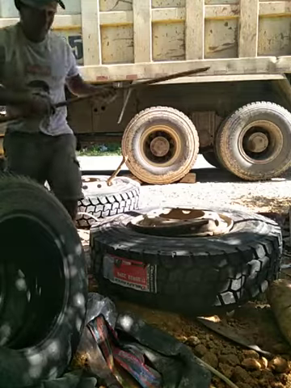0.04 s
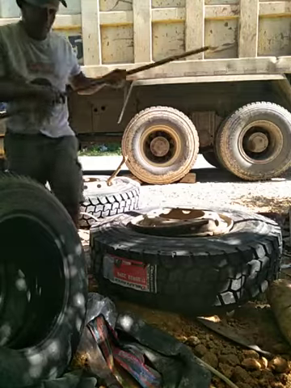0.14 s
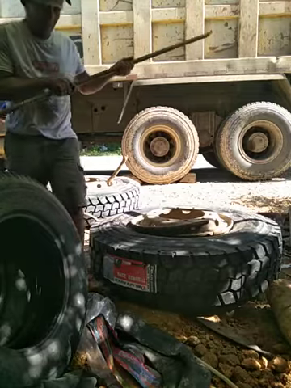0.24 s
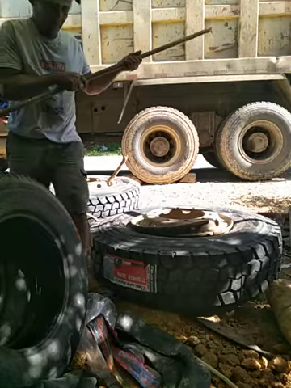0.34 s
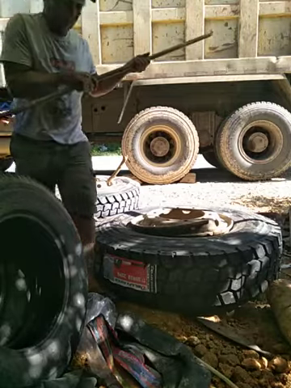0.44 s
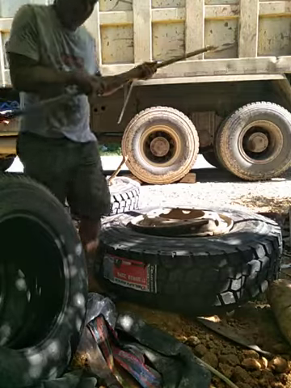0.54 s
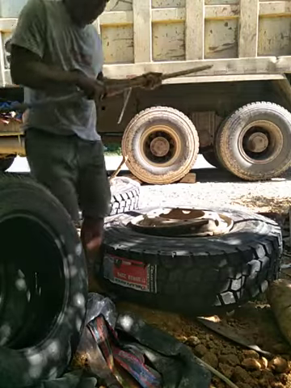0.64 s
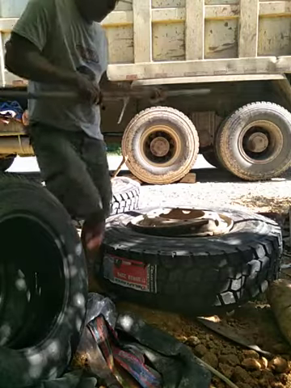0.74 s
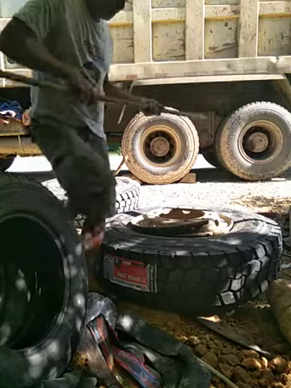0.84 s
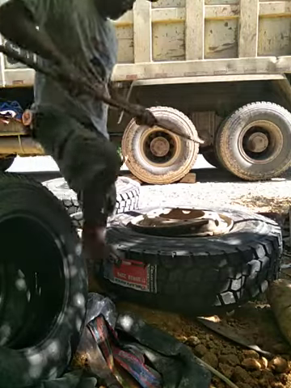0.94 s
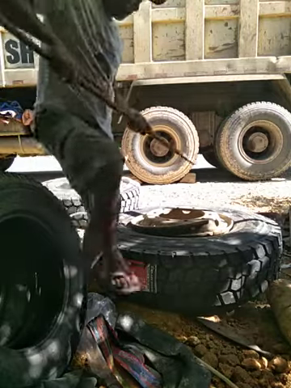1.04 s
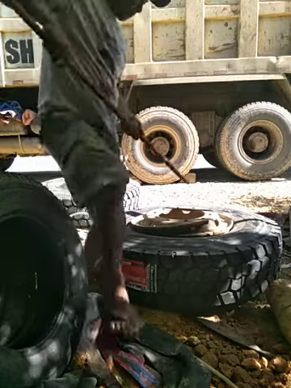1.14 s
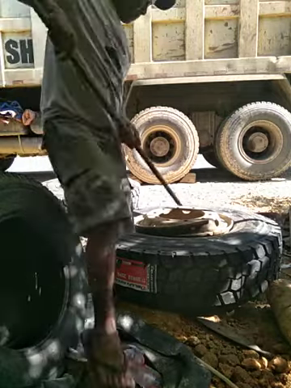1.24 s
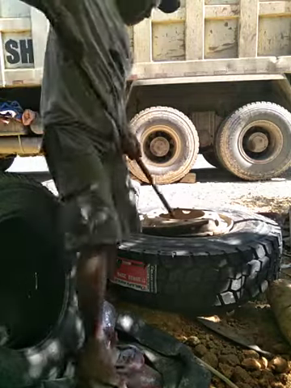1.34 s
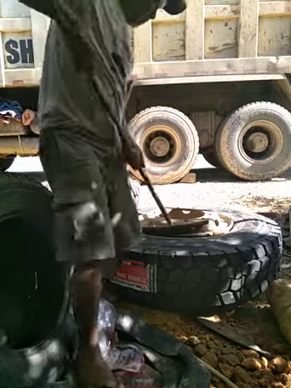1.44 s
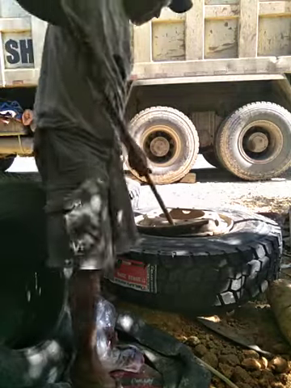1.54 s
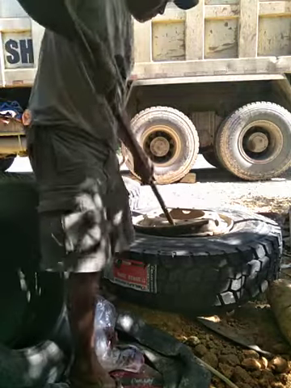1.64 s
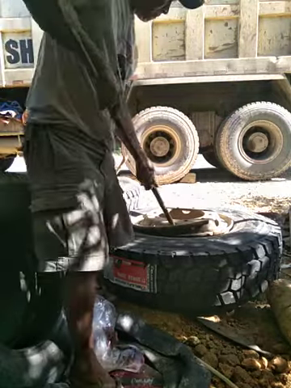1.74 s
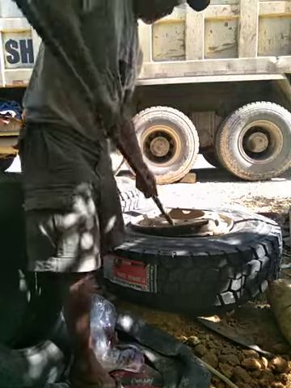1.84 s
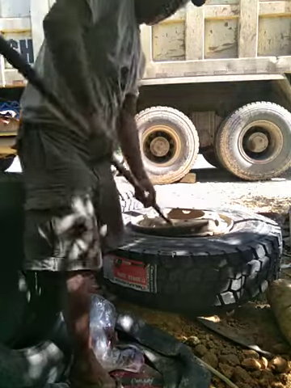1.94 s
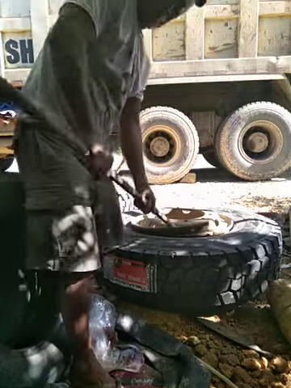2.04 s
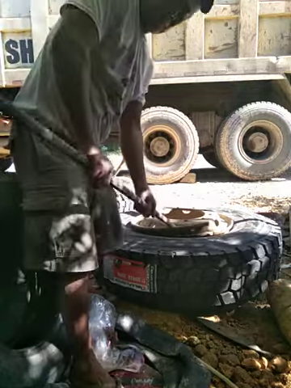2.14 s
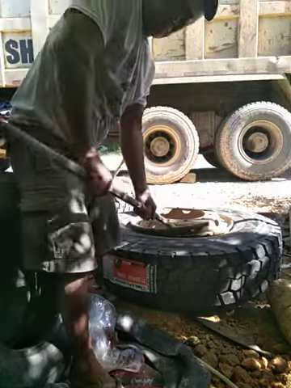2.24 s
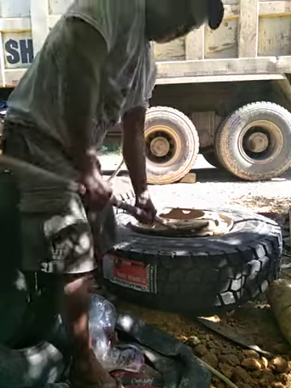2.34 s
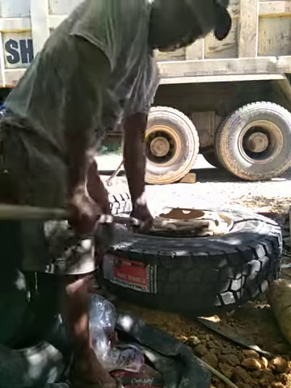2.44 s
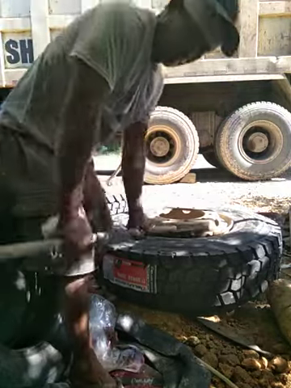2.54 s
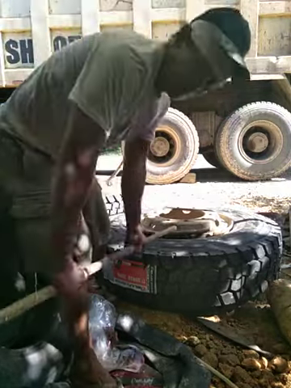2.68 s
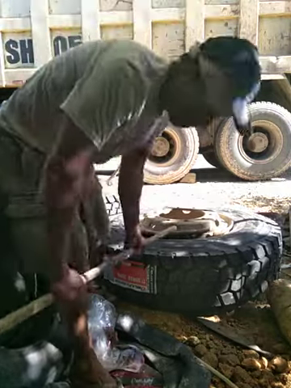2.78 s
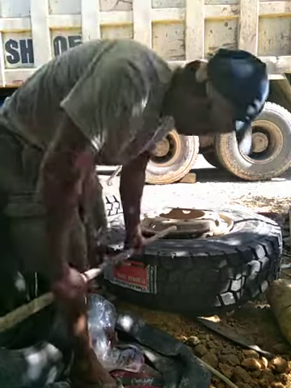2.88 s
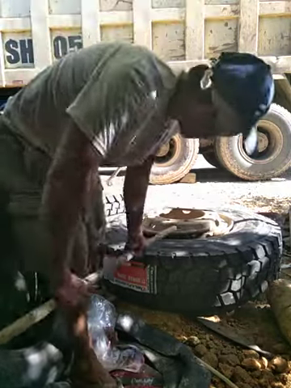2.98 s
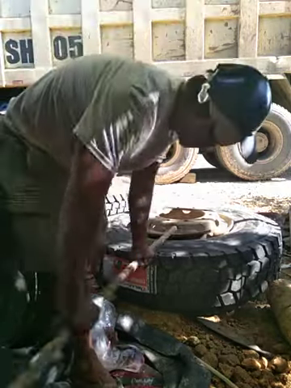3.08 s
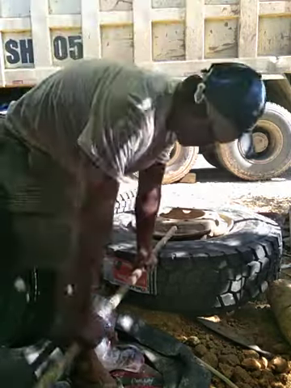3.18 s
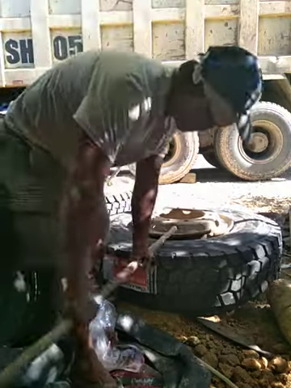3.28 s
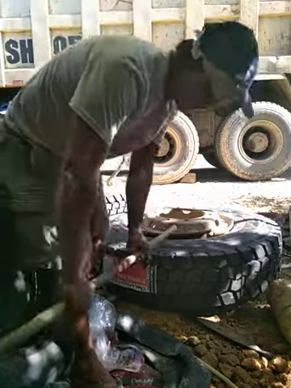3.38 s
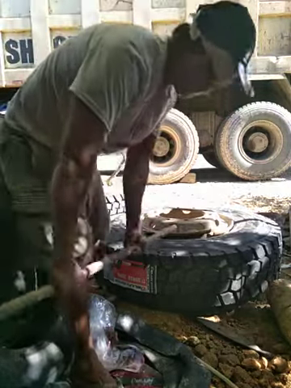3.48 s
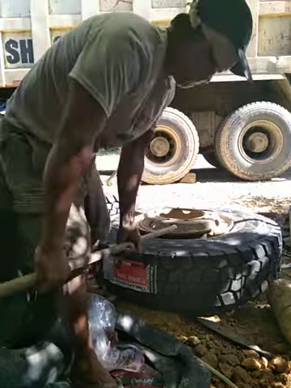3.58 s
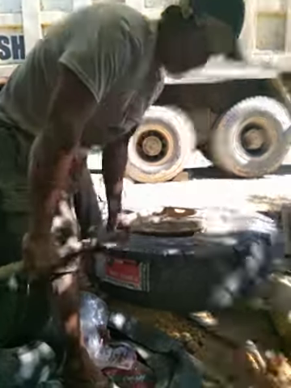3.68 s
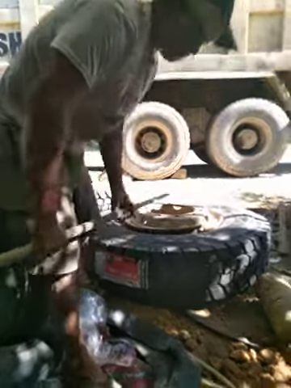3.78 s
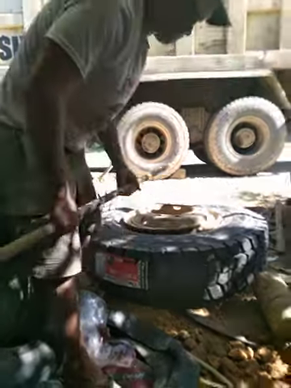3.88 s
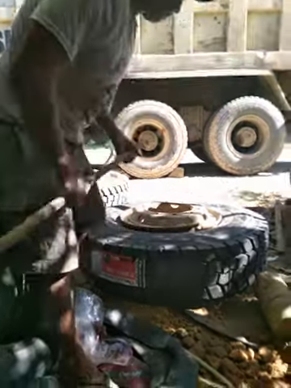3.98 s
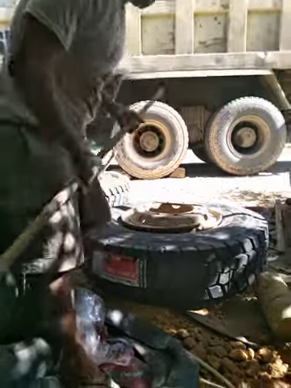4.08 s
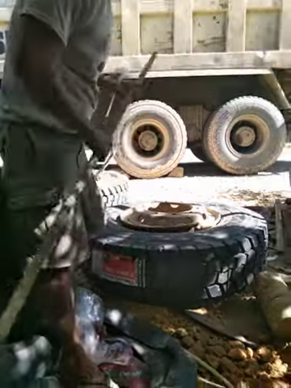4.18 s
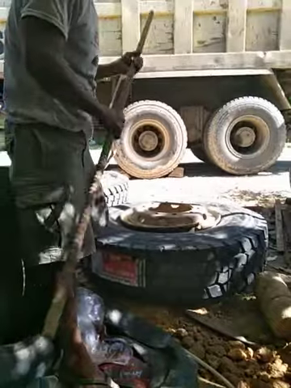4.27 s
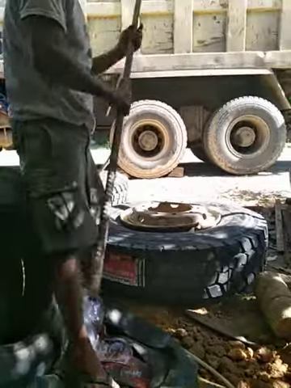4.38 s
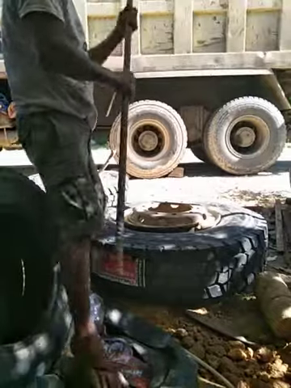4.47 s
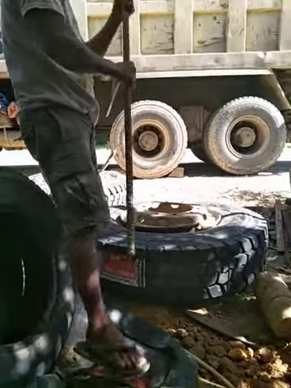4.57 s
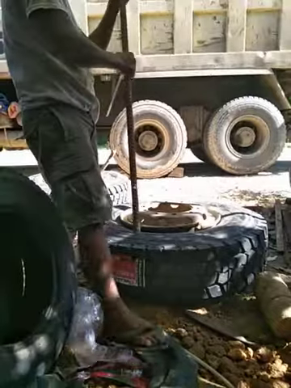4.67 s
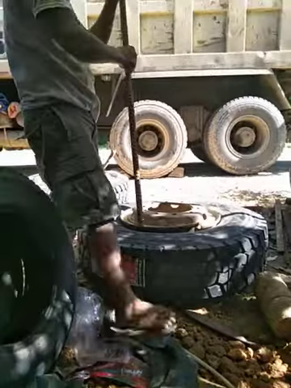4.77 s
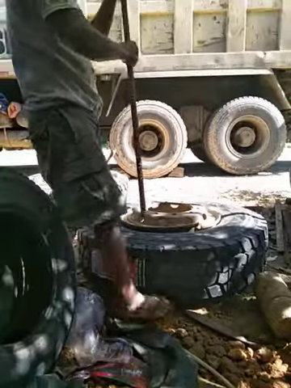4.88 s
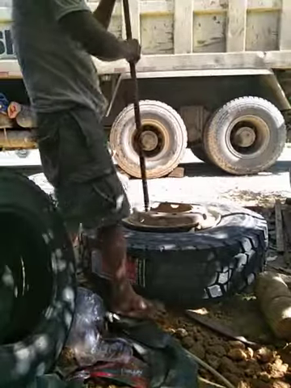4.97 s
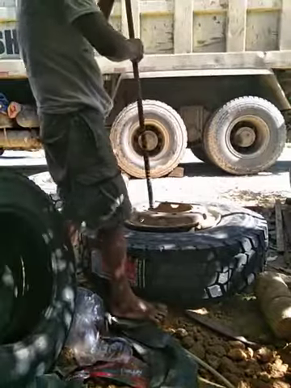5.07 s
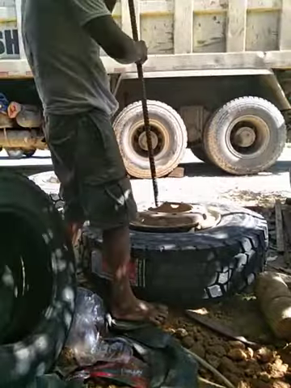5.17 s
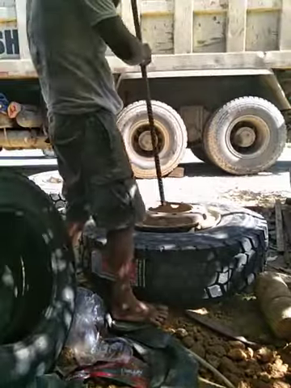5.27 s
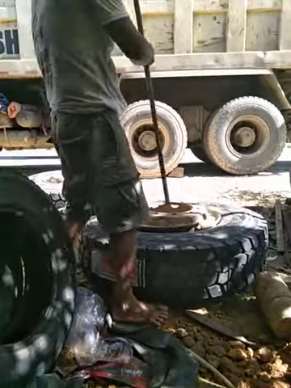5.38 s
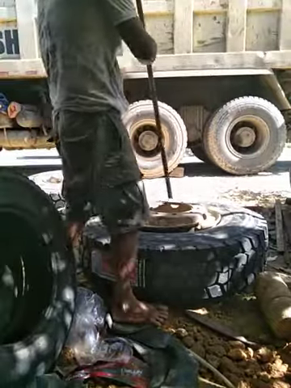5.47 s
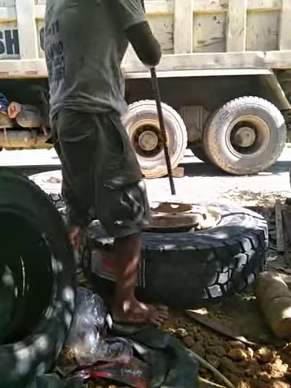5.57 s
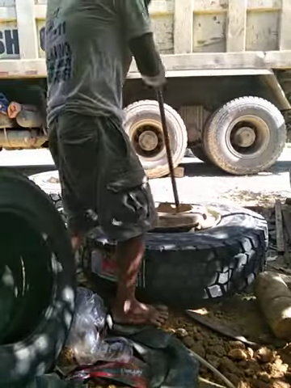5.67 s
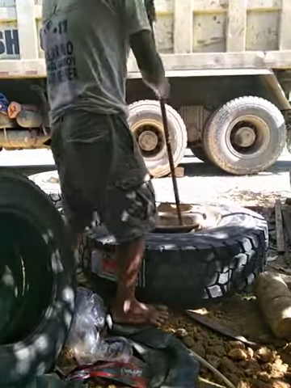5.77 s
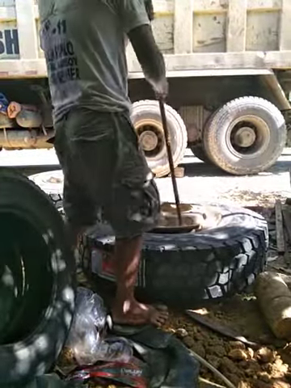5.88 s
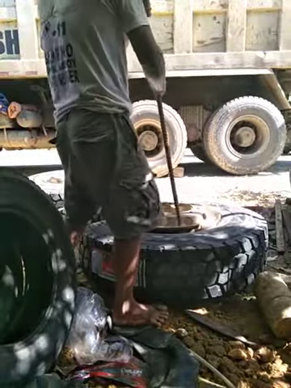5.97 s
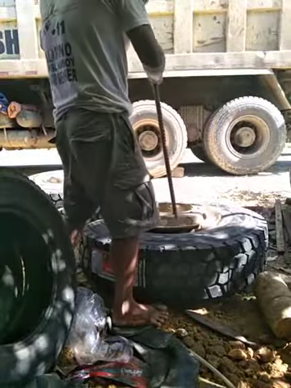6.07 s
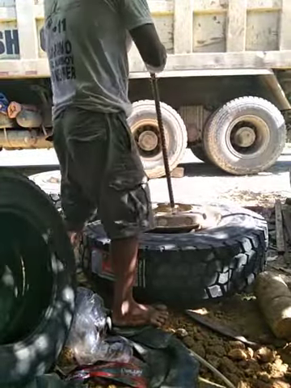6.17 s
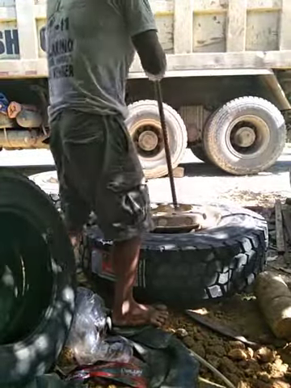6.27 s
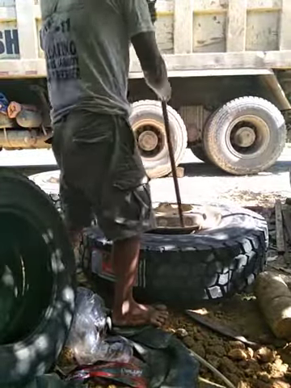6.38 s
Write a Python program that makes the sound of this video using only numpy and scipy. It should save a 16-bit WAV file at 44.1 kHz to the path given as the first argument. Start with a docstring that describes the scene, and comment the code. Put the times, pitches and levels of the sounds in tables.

```python
"""Outdoors, a one-cylinder machine chugs over a drone while feet shuffle and loose metal clatters and tinkles.
From 1.5 s a steel tyre bar knocks, chatters and clanks on a lorry wheel's rim: decaying steel modes, struck.
At 3.7 s the bar drags over gritty rubber and the tyre thuds: gated grains and damped low modes.
Hollow knocks, a faint squeak and chinks of steel follow: short bursts in resonances, and a rising sine.
At 5.8 s the last blow is so loud that the recorder's limiter pulls everything down and lets go slowly."""
import sys
import numpy as np
from scipy import signal
from scipy.fft import rfft, irfft
from scipy.io import wavfile
from scipy.ndimage import uniform_filter1d

SR = 44100
rng = np.random.default_rng(int(sys.argv[2]) if len(sys.argv) > 2 else 0)


def unload_wav(signal):
    """Save mono or channel-first audio to the path in sys.argv[1] as 16-bit WAV at rate SR, clipped to [-1, 1]."""
    wavfile.write(
        sys.argv[1],
        SR,
        np.round(np.clip(np.atleast_2d(signal).T, -1, 1) * 32767).astype(np.int16),
    )


N = 283210
NOW = np.arange(N) / SR
RING = np.arange(int(.6 * SR)) / SR  # time axis of one struck sound, s


# modes of the rim [pitch_hz, level_db, t60_s]
RIM_MODES = [(861, 1, .2), (1120, -7, .2), (1179, -5, .24), (1305, -6, .2), (1400, -5, .2), (1510, -2, .24),
             (1522, -22, 1.2), (1631, 3, .23), (1728, 1.5, .22), (1814, -6, .2), (2180, -9, .22),
             (2310, -9, .18), (2552, -4, .2), (2789, -11, .22), (3250, -9, .19), (3472, -3.5, .2),
             (3828, -2, .22), (3860, -2, .21), (4030, -7, .21), (4200, -11, .23), (4920, -16, .27),
             (5335, -13, .25), (6056, -15, .18), (6433, -12, .17), (6800, -15, .18), (7560, -11, .18),
             (7704, -7, .2), (7865, -7, .19), (8258, -14, .16), (9082, -13, .18), (10900, -26, .2)]
# modes of the bar [pitch_hz, level_db, t60_s]
BAR_MODES = [(978, -7.5, .19), (1177, 2, 0.17), (1304, -1, 0.14), (1481, 1, 0.14), (1570, -1.5, 0.3),
             (2155, -13, 0.28), (2260, -2.5, .35), (2455, -4.5, 0.23), (2660, -7, 0.4), (2930, 1.5, 0.19),
             (3075, -8.5, 0.54), (3536, -1.5, 0.18), (4010, -5.5, 0.31), (4274, -4, .2), (4520, -15, .35),
             (4970, -12.5, 0.27), (5570, -18, .3), (5960, -16, 0.29), (6417, -22.5, .3), (6730, -18, 0.29),
             (7250, -13.5, .11), (8300, -17, .11)]
# modes of the lock ring [pitch_hz, level_db, t60_s]
LOCK_RING_MODES = [(945, -6, .25), (1095, -6, .2), (1175, -2, .24), (1324, 0, .28), (1410, -5, .35),
                   (1814, -1, .26), (2040, 1, .18), (2369, -10, .4), (4264, -7, .22), (6562, -12, .23),
                   (7354, -14, .25), (7720, -8, .17), (7973, -8, .24), (8947, -13, .16), (9184, -14, .17),
                   (9680, -17, .24)]
# spectrum of the rim's crowd of weak, close modes [pitch_hz, density_db_per_hz]
CROWD_SPECTRUM = [(300, -61), (700, -46.5), (860, -7.5), (1200, 2), (1700, 5.5), (2300, -1), (2800, -3.5),
                  (3800, -3), (4250, -5.5), (4600, -6), (5400, -7.5), (7000, -12), (9000, -11),
                  (11500, -21.5), (15500, -44)]


def rim_crowd(length_s, hold, sag_db_per_s):
    """Many close modes of uneven strength sound as coloured noise that sags, then dies away."""
    crowd_t60_s = .26
    release_s = np.maximum(RING - hold * length_s, 0)
    fade = gain_of(-sag_db_per_s * RING - 60 * release_s / crowd_t60_s)
    rasp_db = 2.4 * wander(260)[:len(RING)] * np.exp(-RING / (2 * length_s))  # the contact rasps unevenly
    grid_hz = np.arange(500, 16000, 45)
    unevenness_db = rng.uniform(-1, 1, len(grid_hz)) * np.interp(grid_hz, [1000, 6000], [5, 11])
    noise = coloured(rng.standard_normal(len(RING)), np.column_stack([grid_hz, unevenness_db]))
    return burst(coloured(noise, CROWD_SPECTRUM) * fade * gain_of(rasp_db))


def blow(rim_db, bar_db, lock_db, edge_hz, treble_db, length_s, node_hz, tilt_db_per_oct, crowd_db=4.0,
         hold=0.95, low_hz=870, node_db=-14, node_width_hz=170, sag_db_per_s=45):
    """Chatter rings rim, bar and lock ring; soft contact cuts treble, and modes with a node at the spot are muted."""
    attack_s = .002
    force = chatter(length_s, per_s=2500)
    crowd = rim_crowd(length_s, hold, sag_db_per_s)
    rim = burst(ring(force, RIM_MODES) + gain_of(crowd_db) * crowd)
    bar = paired(force, BAR_MODES)
    lock_ring = paired(force, LOCK_RING_MODES)
    steel = gain_of(rim_db) * rim + gain_of(bar_db) * bar + gain_of(lock_db) * lock_ring

    grid_hz = np.arange(500, 16000, 45)
    off_node = (grid_hz % (2 * node_hz) - node_hz) / node_width_hz  # dips at odd multiples of node_hz
    spot_db = node_db * np.exp(-off_node ** 2) + tilt_db_per_oct * np.log2(grid_hz / 2000)
    steel = coloured_padded(steel, np.column_stack([grid_hz, spot_db]))
    steel = steel * (1 - np.exp(-RING / attack_s))
    high_pass = signal.butter(7, low_hz, "high", fs=SR, output="sos")
    steel = signal.sosfilt(high_pass, steel)  # small steel radiates no bass
    contact = [(edge_hz, 0), (edge_hz * 1.045, treble_db), (edge_hz * 2, treble_db * 1.23), (SR, treble_db * 1.8)]
    return coloured_padded(steel, contact)


# blows of bar on rim, part levels before the spot and contact filters; treble is that above the edge
# [start_s, rim_db, bar_db, lock_ring_db, contact_edge_hz, treble_db, chatter_s, first_muted_pitch_hz,
#  tilt_db_per_octave]
BLOW_EVENTS = [(1.546, -33.5, -21.5, -40, 7350, -16, 0.042, 1870, 1),
               (1.666, -42, -35.5, -60, 4000, -30, 0.008, 1870, 6),
               (1.732, -32, -24, -29.5, 1600, -18.5, 0.02, 1890, -0.5),
               (1.798, -52, -32.5, -41, 1590, -20, 0.031, 1880, -1),
               (1.843, -24, -24, -29, 1440, -29, 0.0097, 1890, 4.5),
               (1.857, -42, -35, -40, 1480, -28, .006, 1890, 4),
               (1.867, -33, -34, -41, 1527, -19.5, 0.0092, 1870, 3.5),
               (2.426, -32, -33, -32, 2420, -13.5, 0.021, 2930, -3.5),
               (2.512, -23, -40.5, -33, 3360, -21, 0.02, 4000, 3),
               (2.608, -34.5, -33, -37, 2680, -24, 0.03, 2120, 0),
               (2.6646, -18, -29.5, -25, 4900, -5.5, 0.0072, 1630, -0.5),
               (2.677, -25.5, -23, -26, 9400, 1, 0.013, 1750, 1),
               (2.687, -26.5, -34, -23.5, 8300, -8, 0.033, 1710, 1),
               (2.7892, -25, -37.5, -33, 7040, -8, 0.016, 2400, 1.5),
               (3.424, -46, -46, -61, 3940, -18, 0.013, 1820, -1),
               (4.758, -58, -43.5, -53, 1700, -26, 0.042, 2700, 2),
               (5.821, 12, -16, -19, 9500, -5, 0.078, 4600, 1)]


def blows():
    """Each blow of the bar sets the wheel's steel ringing."""
    out = np.zeros(N)
    for start_s, *how in BLOW_EVENTS:
        add(out, start_s, blow(*how))
    return out


# chinks of steel that stand out of the jingle [start_s, level_db, pitch_hz, t60_s]
CHINK_EVENTS = [(.218, -53, 7680, 0.12), (0.365, -56, 4060, 0.11), (0.65, -47.5, 2348, 0.19),
                (0.812, -45.5, 11340, 0.23), (.815, -54.5, 8930, 0.069), (.814, -60, 14800, 0.076),
                (2.01, -53, 4280, 0.1), (2.075, -50, 6570, 0.15), (2.425, -51, 5710, 0.051),
                (2.515, -51, 6040, 0.18), (2.86, -42, 2415, 0.18), (3.64, -50, 9300, .12),
                (3.645, -54, 5220, .14), (4.815, -45.5, 1180, 0.08), (5.235, -45, 2207, 0.32),
                (5.366, -53, 6450, 0.16), (5.37, -49, 2450, 0.22), (5.436, -52, 6150, 0.25),
                (5.44, -51, 4400, 0.17), (5.703, -58, 7400, .25), (5.726, -43, 2420, 0.94),
                (5.78, -44.5, 3860, 0.17)]


def chinks(scrape_db=-12):
    """Light chinks scrape and swell as the steel slides: a swelling chatter drives three modes."""
    out = np.zeros(N)
    for start_s, level_db, pitch_hz, t60_s in CHINK_EVENTS:
        cluster = [(pitch_hz * 0.58, -14, t60_s), (pitch_hz, 0, t60_s), (pitch_hz * 1.05, -10, t60_s)]
        slide = resonate_twice(chatter(0.015) * RING, pitch_hz, pitch_hz / 7)
        chink = ring(slide, cluster) + gain_of(scrape_db) * burst(slide)
        add(out, start_s, gain_of(level_db) * chink)
    return out


# the tyre's damped modes before the stiffness factor [pitch_hz, level_db, t60_s]
TYRE_MODES = [(88, 1.5, 0.19), (127.3, 13, 0.19), (148.3, 12, 0.25), (187.3, 6, 0.28), (235, -1, 0.14),
              (396, -12, 0.069)]
# shoves on the rubber, level before the band filter [start_s, level_db, length_s, stiffness_pitch_factor]
THUD_EVENTS = [(0.0, -42, 0.16, 0.4), (2.038, -38, 0.14, 0.66), (2.42, -35.5, 0.05, 0.73),
               (2.515, -29, 0.052, 0.73), (2.626, -33, 0.0069, 0.85), (2.67, -37, 0.085, 0.54),
               (2.762, -33, 0.079, 0.79), (2.81, -34, 0.048, 0.96), (3.185, -30, 0.061, 0.88),
               (3.238, -33.5, 0.013, 0.79), (3.737, -21, 0.071, 1.1), (3.832, -25.5, 0.032, 0.89),
               (3.916, -28.5, 0.033, 0.92), (3.985, -38, .09, 0.94), (5.824, -19, 0.018, 0.81)]


def tyre_thuds(low_hz=60, top_hz=450, give_s=0.0079):
    """Rubber slips in jerks and booms: a soft-edged chatter drives damped low modes."""
    out = np.zeros(N)
    for start_s, level_db, length_s, stiffness in THUD_EVENTS:
        modes = [(hz * stiffness, mode_db, t60_s) for hz, mode_db, t60_s in TYRE_MODES]
        shove = chatter(length_s, per_s=2700) * (1 - np.exp(-RING / give_s))
        add(out, start_s, gain_of(level_db) * ring(shove, modes))
    return signal.sosfilt(signal.butter(3, [low_hz, top_hz], "band", fs=SR, output="sos"), out)


def slide_gain(start_s, level_db, hold_s):
    """The bar bites, slides while the push eases, then comes free."""
    attack_s, ease_db_per_s, release_db_per_s = 0.008, 33, 176
    t = np.maximum(NOW - start_s, 0)
    fall_db = ease_db_per_s * t + release_db_per_s * np.maximum(t - hold_s, 0)
    return np.minimum(t / attack_s, 1) * gain_of(level_db - fall_db)


# slides of the bar over gritty rubber [start_s, level_db, hold_s]
DRAG_EVENTS = [(3.73, -24.5, 0.089), (3.829, -31, 0.026), (3.907, -45, 0.061)]
# spectrum of the drag [pitch_hz, density_db_per_hz]
DRAG_SPECTRUM = [(60, -36), (130, -1), (240, -5), (450, 12.5), (560, 8), (720, -18), (950, 2.5), (1150, -4),
                 (1700, -3.5), (2100, -19), (2450, -4.5), (2900, -9), (3400, -28.5), (7000, -43),
                 (14000, -64)]


def bar_drag(grains_per_s=14000):
    """Grit crunches under the dragged bar: random grains, jerking as the rubber grips and lets go."""
    grains = rng.standard_normal(N) * (rng.random(N) < grains_per_s / SR)
    jerks = gain_of(2 * wander(160))
    gain = sum(slide_gain(*row) for row in DRAG_EVENTS)
    return gain * evened(coloured(grains * jerks, DRAG_SPECTRUM))


# dull, hollow knocks [start_s, level_db, pitch_hz, t60_s]
KNOCK_EVENTS = [(4.338, -41, 490, 0.11), (4.412, -39.5, 490, 0.13), (5.301, -45, 324, 0.017),
                (5.442, -42, 477, 0.12)]


def knocks(contact_s=0.0029):
    """Dull, hollow knocks, each ringing on one low note."""
    out = np.zeros(N)
    for start_s, level_db, pitch_hz, t60_s in KNOCK_EVENTS:
        push = resonate(chatter(contact_s, per_s=3000), pitch_hz, pitch_hz / 2)
        add(out, start_s, gain_of(level_db) * ring(push, [(pitch_hz, 0, t60_s)]))
    return out


def squeak(middle_s=4.795, half_s=.025, middle_hz=960, rise_hz_per_s=6000, level_db=-45):
    """A faint rising squeak as the bar's tip slips: a gliding sine of unsteady level."""
    pitch_hz = middle_hz + rise_hz_per_s * np.clip(NOW - middle_s, -2 * half_s, 2 * half_s)
    tone = np.sin(2 * np.pi * np.cumsum(pitch_hz) / SR)
    return gain_of(level_db + 2 * wander(120)) * bell(middle_s, half_s) * tone


# shuffles on ground and rubber [middle_s, level_db, half_length_s]
STEP_EVENTS = [(.03, -36, 0.07), (2.08, -50.5, 0.95), (4.04, -35, 0.18), (4.68, -43.5, 0.097),
               (5.2, -44, 0.23), (5.7, -40, 0.16)]
# spectrum of shuffling feet [pitch_hz, density_db_per_hz]
FEET_SPECTRUM = [(30, -19), (70, -1.5), (120, 7.5), (230, 3), (340, -25.5), (470, 6), (750, -36),
                 (3000, -45), (12000, -75)]


def feet():
    """Feet shuffle on ground and rubber: unsteady low noise that swells and fades."""
    shuffle = coloured(rng.standard_normal(N) * gain_of(4 * wander(25)), FEET_SPECTRUM)
    return swells(STEP_EVENTS) * evened(shuffle)


STROKE_S = 0.068506
# the exhaust's broad resonances [pitch_hz, level_db, time_spread_s, unsteadiness_db]
EXHAUST_MODES = [(614, 2, .005, 1), (495, -10, 0.009, 4), (420, -19, .005, 5), (285, -16, .0065, 4),
                 (150, -13.5, 0.0071, 4), (1400, -18, 0.0018, 4)]


def exhaust_puff(t, bend, vary):
    """One puff excites the exhaust's resonances as short wave packets; long ones peak later."""
    build_s = .005
    out = np.zeros(len(t))
    for (hz, mode_db, spread_s, vary_db), chance in zip(EXHAUST_MODES, vary):
        envelope = np.exp(-((t - max(spread_s - build_s, 0)) / spread_s) ** 2)
        out += gain_of(mode_db + vary_db * chance) * envelope * np.cos(2 * np.pi * hz * bend * t)
    return out


# each stroke's puffs and their echoes [delay_s, level_db, unsteadiness_db]
STROKE_PUFFS = [(-.0099, -15, 2), (0., 0.5, 1), (.0081, -14, 3), (.0153, -12.5, 2.5), (.035, -15, 1.5),
                (.0484, -20, 1)]
# level of the chug and strength of its echoes over time [time_s, level_db, echo_db]
CHUG_LEVELS = [(0, -43, -4.5), (0.449, -41, 2.5), (.78, -43.5, -8), (.86, -45, -15.5), (1.2, -42.5, 2.5),
               (1.9, -40.5, -2.5), (2.6, -43.5, 4), (2.72, -42, -10.5), (2.9, -40, 1), (3.4, -39, 2),
               (3.95, -36.5, -2), (4.4, -38.5, 4.5), (4.7, -42.5, 8), (5.15, -38.5, 4.5), (5.25, -52, 11),
               (5.37, -70, 0.5), (5.44, -43.5, 8), (5.8, -39.5, -3), (5.9, -43, 1.5)]
# steady drone; width is that of each of two cascaded resonances [pitch_hz, width_hz, level_db]
DRONE_BANDS = [(121.4, 12, -54.5), (151.8, 16, -63), (303.4, 18, -54), (616, 49, -59)]


def machine(pitch_scatter=0.018, echo_jitter_s=0.000804):
    """Every stroke puffs through the exhaust, no two quite alike; echoes follow, over a steady drone."""
    t = np.arange(-SR // 50, SR // 50 + 1) / SR
    when_s, level_db, echo_db = np.transpose(CHUG_LEVELS)
    chug = np.zeros(N)
    for stroke_s in np.arange(.0278, N / SR, STROKE_S):
        for delay_s, puff_db, unsteady_db in STROKE_PUFFS:
            size, late, bend, *vary = rng.standard_normal(3 + len(EXHAUST_MODES))
            puff = exhaust_puff(t, 1 + pitch_scatter * bend, vary)
            is_echo = delay_s > .004
            gain = gain_of(puff_db + unsteady_db * size + is_echo * np.interp(stroke_s, when_s, echo_db))
            add(chug, stroke_s + delay_s + t[0] + is_echo * echo_jitter_s * late, gain * puff)
    return evened(chug) * gain_of(np.interp(NOW, when_s, level_db)) + bands(DRONE_BANDS)


# bands of the clatter, relative levels; width is per resonance [pitch_hz, width_hz, level_db]
CLATTER_BANDS = [(1236, 120, 6), (1407, 59, 10), (1600, 540, 3), (2375, 355, 10), (3206, 710, -1.5),
                 (3935, 160, -3), (8370, 390, -4.5)]
# bands of the high, fine ring of loose metal, likewise [pitch_hz, width_hz, level_db]
TINKLE_BANDS = [(4210, 280, -0.5), (5400, 590, -7.5), (6403, 410, 1.5), (7630, 330, 0.5),
                (8850, 670, -10.5), (12400, 600, -9.5)]
# bouts of harder clatter [middle_s, level_over_resting_db, half_length_s]
CLATTER_BOUTS = [(.2, -1, 0.27), (1.73, 6, 0.2), (3.55, -2, 0.18), (4.5, -6, 0.6), (5.42, -2, 0.092),
                 (5.73, 2, 0.17)]
# bouts of tinkling, level before the throb [middle_s, level_db, half_length_s]
TINKLE_BOUTS = [(.12, -59, 0.21), (.6, -61, 0.14), (1.95, -56, 0.1), (2.33, -63, 0.46), (3.72, -53, 0.11),
                (4.0, -53, 0.13), (4.55, -61.5, 0.27), (5.46, -48, 0.08), (5.75, -49.5, 0.11)]


def rattle(clatter_db=-51.5, tinkle_db=-66, throb=0.19):
    """Loose metal clatters and tinkles in patchy noise bands, throbbing with the machine."""
    clatter = bands(CLATTER_BANDS)
    tinkle = bands(TINKLE_BANDS)
    clatter = patchy(clatter, 6.5, 210, .045)
    tinkle = patchy(tinkle, 7.5, 170, .08)
    clatter_gain = gain_of(clatter_db) * (1 + swells(CLATTER_BOUTS))
    tinkle_gain = gain_of(tinkle_db) + swells(TINKLE_BOUTS)
    shake = 1 + throb * np.cos(2 * np.pi * (NOW - .0275) / STROKE_S)
    return shake * (clatter_gain * clatter + tinkle_gain * tinkle)


# spectrum of the open air [pitch_hz, density_db_per_hz]
AIR_SPECTRUM = [(25, -64), (60, -3.5), (110, -1), (200, 2), (380, -7.5), (600, 3), (900, -4.5), (2000, -18),
                (4000, -21), (5200, -27.5), (8300, -18), (11000, -30), (13000, -43.5), (15500, -37.5)]


def yard(level_db=-48):
    """Open-air rumble and hiss: coloured noise of slightly wandering level."""
    air = evened(coloured(rng.standard_normal(N), AIR_SPECTRUM))
    return gain_of(level_db) * air * gain_of(.8 * wander(5))


def chatter(length_s, per_s=1100, first=1.0):
    """A first contact, then a quickly dying run of tiny rebounds."""
    force = rng.standard_normal(len(RING)) * (rng.random(len(RING)) < per_s / SR)
    force[0] = first
    return force * np.exp(-(RING / length_s) ** 2)


def ring(force, modes):
    """A force rings each (pitch_hz, level_db, t60_s) mode, some in push and some in pull."""
    signs = rng.choice([-1, 1], len(modes))
    out = np.zeros(len(force))
    for sign, (hz, level_db, t60_s) in zip(signs, modes):
        width_hz = np.log(1000) / np.pi / t60_s
        out += sign * gain_of(level_db) * burst(resonate(force, hz, width_hz))
    return burst(out)


def paired(force, modes, split=.007, twin_db=-6):
    """Steel that is not quite round rings each mode as a close, beating pair."""
    twins = [(hz * (1 + split * rng.uniform(0.56, 1.5)), db + twin_db, t60_s) for hz, db, t60_s in modes]
    return ring(force, modes + twins)


def resonate(x, hz, width_hz):
    """One two-pole resonance."""
    r = np.exp(-np.pi * abs(width_hz) / SR)
    return signal.lfilter([1, 0, -1], [1, -2 * r * np.cos(2 * np.pi * hz / SR), r * r], x)


def resonate_twice(x, hz, width_hz):
    """Two equal resonances in cascade, for steeper skirts."""
    return resonate(resonate(x, hz, width_hz), hz, width_hz)


def bands(rows):
    """Sum of noise bands, each at rms 1 before its level."""
    out = np.zeros(N)
    for hz, width_hz, level_db in rows:
        out += gain_of(level_db) * evened(resonate_twice(rng.standard_normal(N), hz, width_hz))
    return out


def patchy(x, depth_db, patch_hz, patch_s):
    """Lets small patches of pitch and time flare and fade."""
    hz, t, z = signal.stft(x, SR, nperseg=1024, noverlap=768)
    across = np.fft.fftfreq(len(hz), hz[1])[:, None]
    along = np.fft.fftfreq(len(t), t[1])
    smooth = np.exp(-(across * patch_hz) ** 2 - (along * patch_s) ** 2)
    field = evened(np.fft.ifft2(np.fft.fft2(rng.standard_normal(z.shape)) * smooth).real)
    flared = z * gain_of(depth_db * np.minimum(field, 2))
    return evened(signal.istft(flared, SR, nperseg=1024, noverlap=768)[1][:N])


def coloured(x, points):
    """Filters by a spectrum of (pitch_hz, level_db) rows."""
    f, db = np.transpose(points)
    hz = np.fft.rfftfreq(len(x), 1 / SR)
    return irfft(rfft(x) * gain_of(np.interp(np.log(hz + 1), np.log(f), db)), len(x))


def coloured_padded(x, points):
    """Filters a struck sound with silence behind it, so that its tail does not wrap to the start."""
    return coloured(np.pad(x, (0, len(RING))), points)[:len(RING)]


def wander(per_s):
    """Random knots joined by lines, scaled to rms 1."""
    knots = rng.standard_normal(2048)
    return evened(np.interp(NOW * per_s, np.arange(len(knots)), knots))


def bell(middle_s, half_s):
    """A smooth rise and fall of height 1."""
    return np.exp(-((NOW - middle_s) / half_s) ** 2)


def swells(rows):
    """Summed gain of (middle_s, level_db, half_length_s) swells."""
    return sum(gain_of(db) * bell(middle_s, half_s) for middle_s, db, half_s in rows)


def gain_of(db):
    """Decibels to gain."""
    return 10 ** (np.asarray(db) / 20)


def evened(x):
    """Scales to rms 1."""
    return x / np.sqrt(np.mean(x ** 2) + 1e-20)


def burst(x):
    """Scales a short sound to the energy of 50 ms at rms 1."""
    return x / np.sqrt(np.sum(x ** 2) / (SR / 20) + 1e-20)


def add(mix, start_s, sound):
    """Adds a sound at a time."""
    part = mix[max(round(start_s * SR), 0):][:len(sound)]
    part += sound[:len(part)]


def scene():
    """Everything at the microphone."""
    steel = blows() + chinks()
    tyre = tyre_thuds() + bar_drag()
    return (steel + tyre + knocks() + squeak() + feet() + machine() + rattle() + yard())[None]


def record(dry, limit_db=-12.0, recover_db_per_s=14, hiss_db=-62, edge_hz=15700):
    """A limiter with quick fall and slow recovery, the recorder's own hiss, then the band limit."""
    power_db = 10 * np.log10(abs(uniform_filter1d(dry[0] ** 2, size=300)) + 1e-12)
    recovery_db = NOW * recover_db_per_s
    held_db = np.maximum.accumulate(power_db + recovery_db) - recovery_db  # peak hold that sinks steadily
    over_db = np.maximum(held_db - limit_db, 0)
    limited = dry / gain_of(uniform_filter1d(over_db, size=60))
    hiss_spectrum = [(60, 5.5), (700, 1.0), (2000, -9.0), (4000, -8.0), (5200, -16.0), (8300, -7.5), (12000, -29.0)]
    hiss = evened(coloured(rng.standard_normal(N), hiss_spectrum))
    low_pass = signal.firwin(511, edge_hz, window=("kaiser", 9), fs=SR)
    return signal.oaconvolve(limited + gain_of(hiss_db) * hiss, low_pass[None], "same")


dry = scene()
out = record(dry)
unload_wav(out)
```